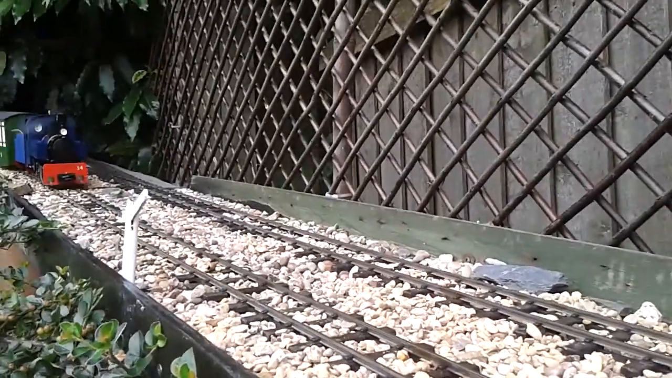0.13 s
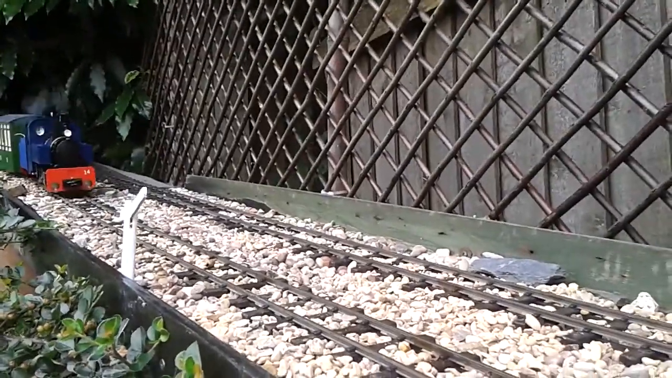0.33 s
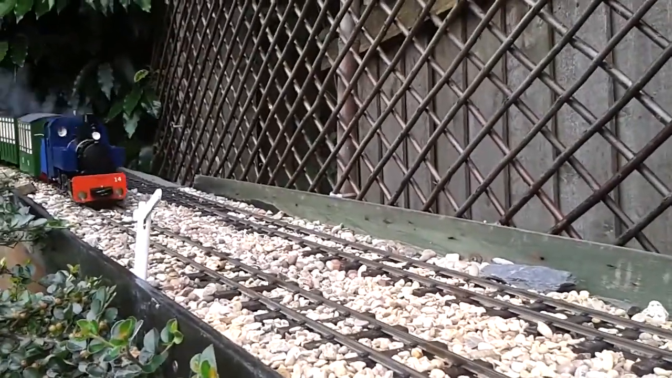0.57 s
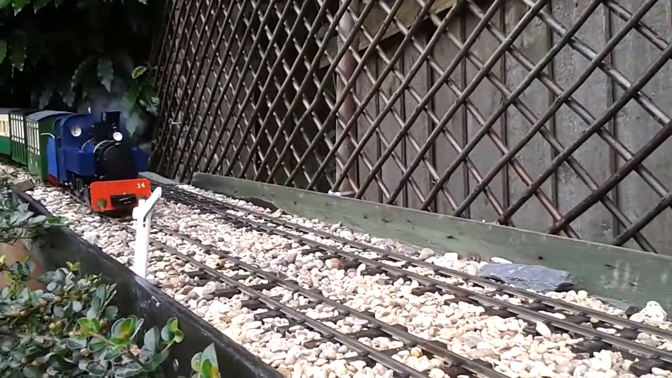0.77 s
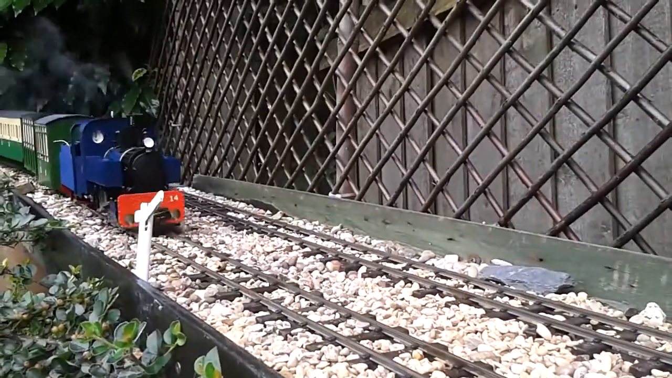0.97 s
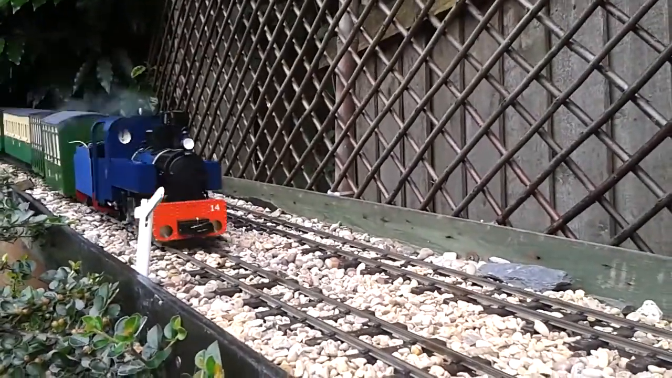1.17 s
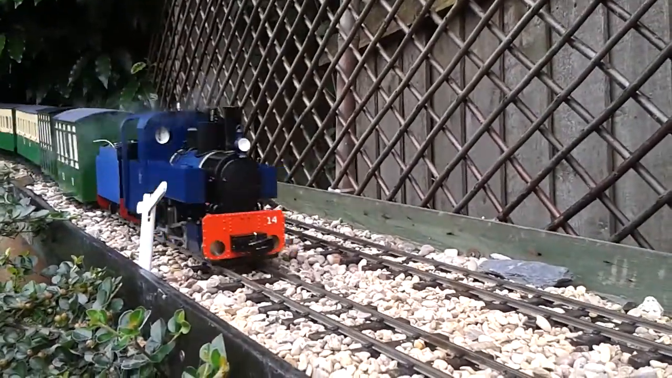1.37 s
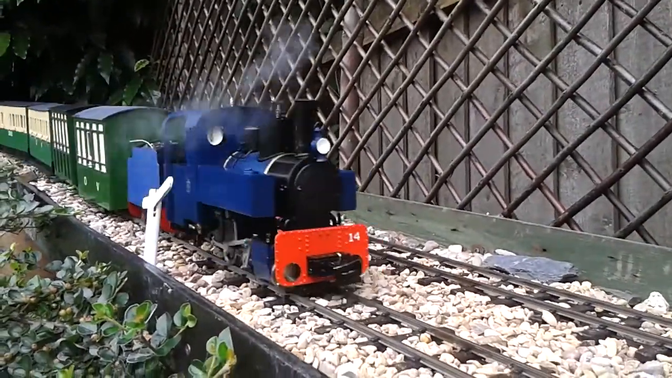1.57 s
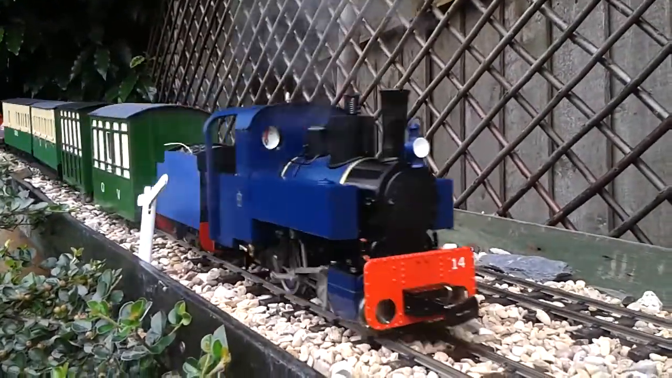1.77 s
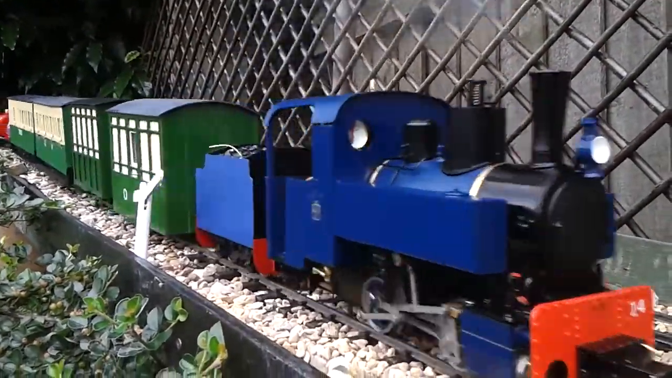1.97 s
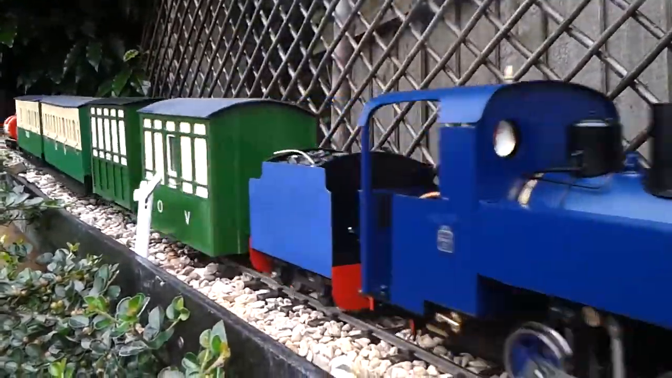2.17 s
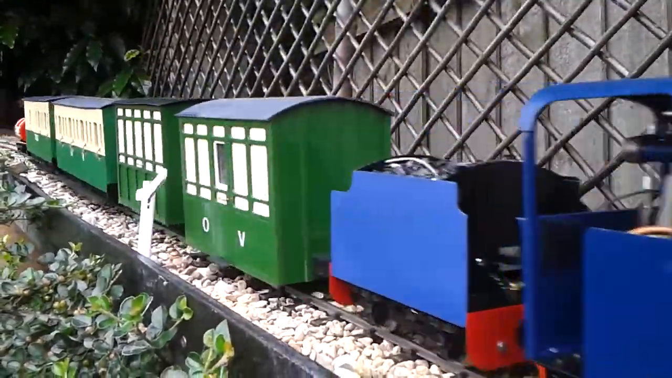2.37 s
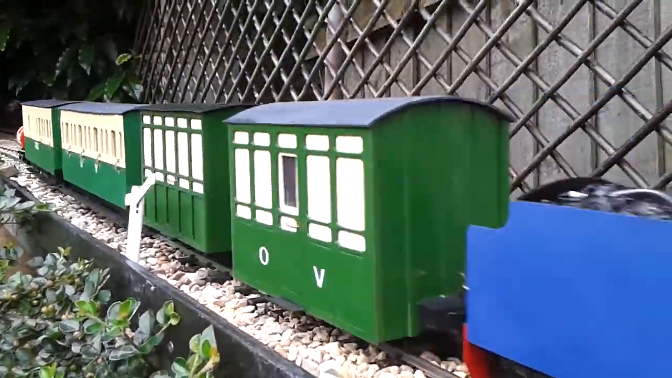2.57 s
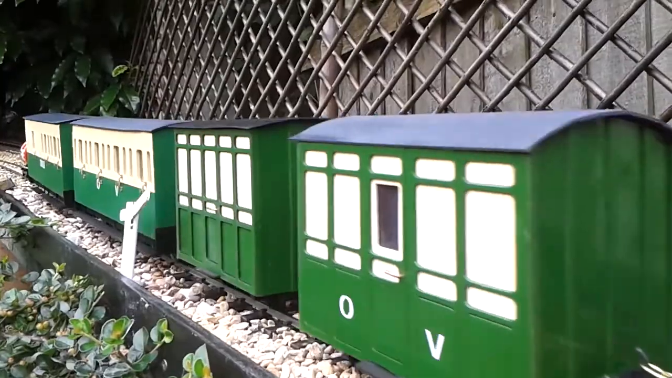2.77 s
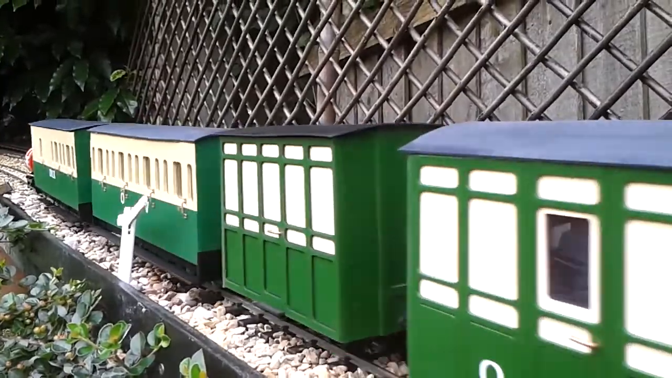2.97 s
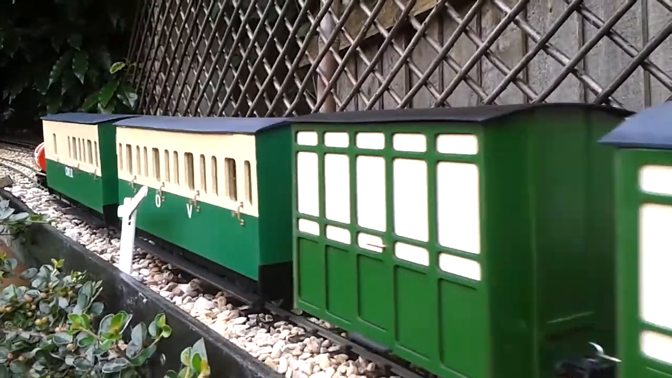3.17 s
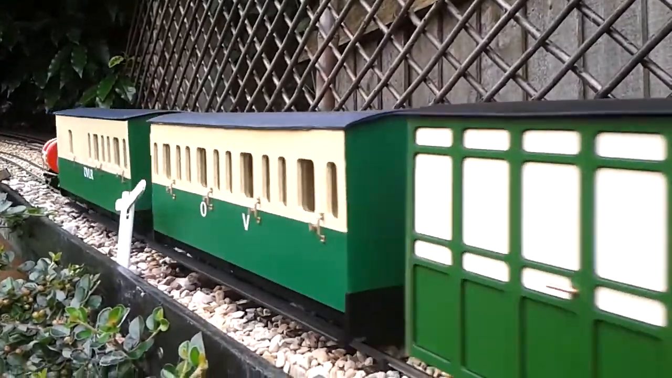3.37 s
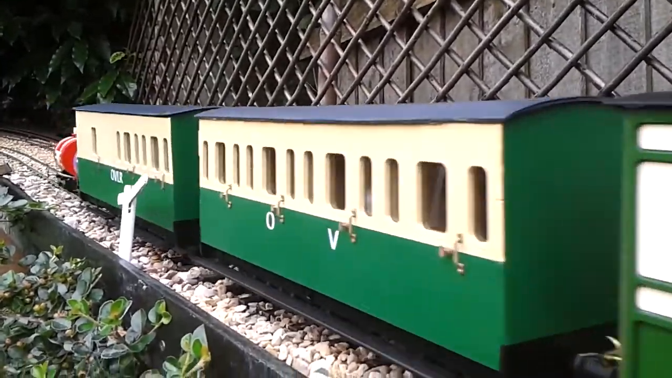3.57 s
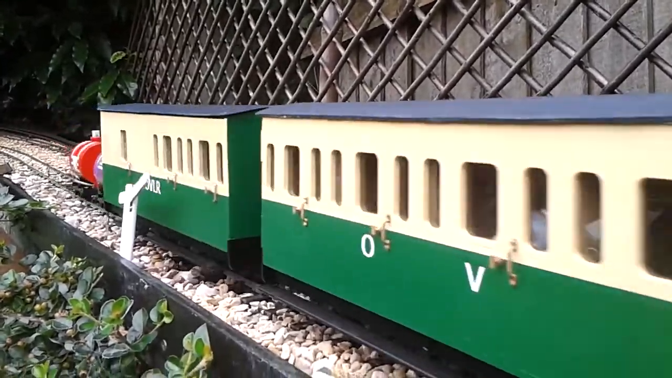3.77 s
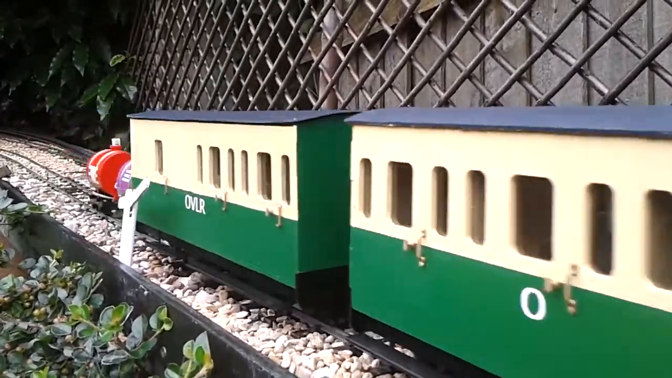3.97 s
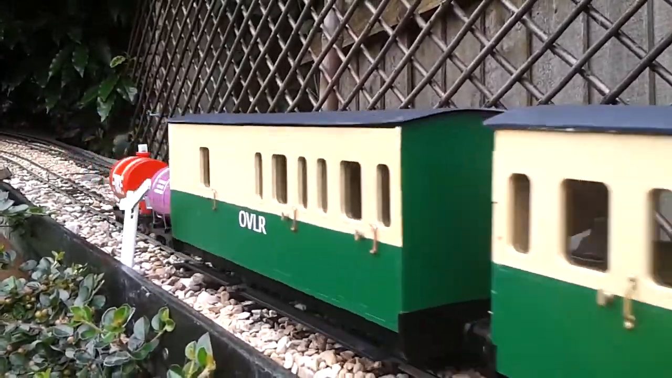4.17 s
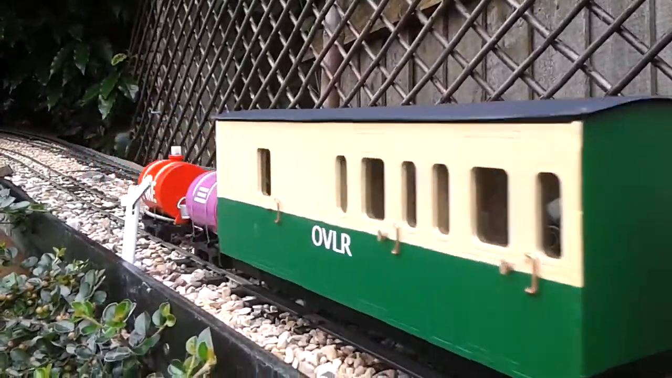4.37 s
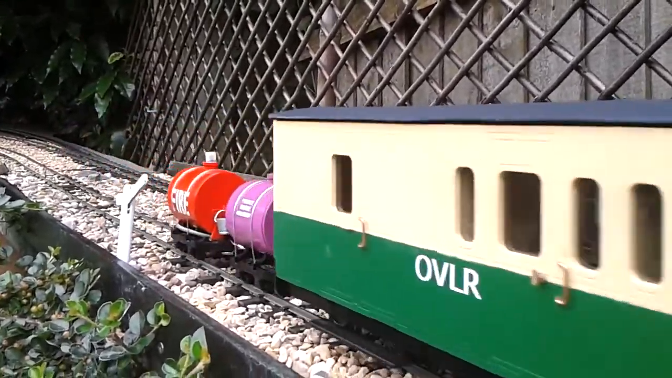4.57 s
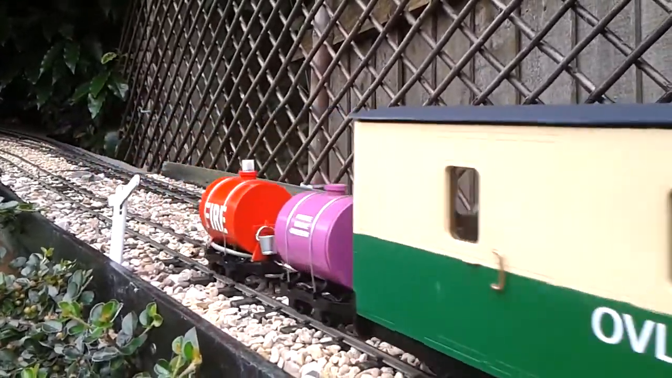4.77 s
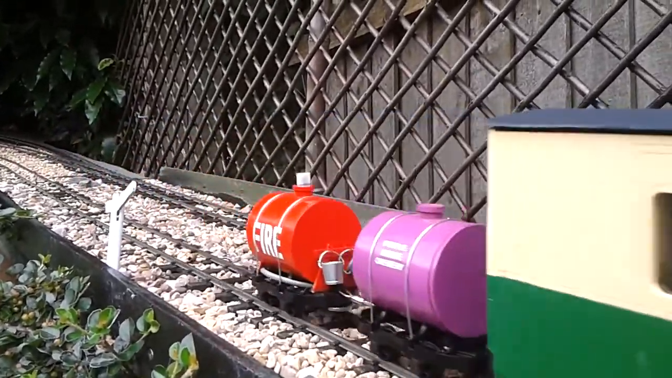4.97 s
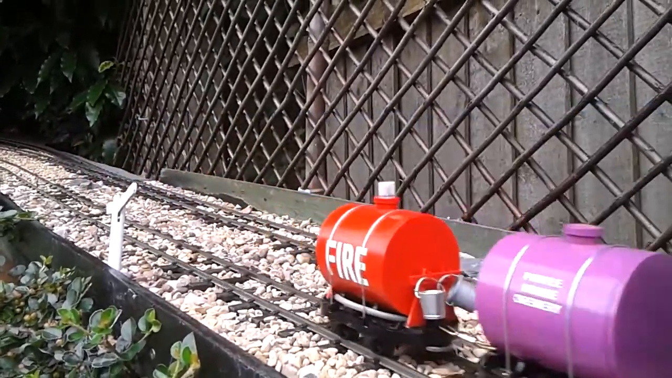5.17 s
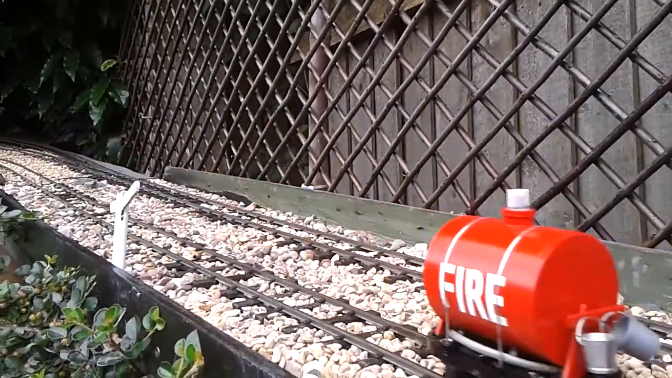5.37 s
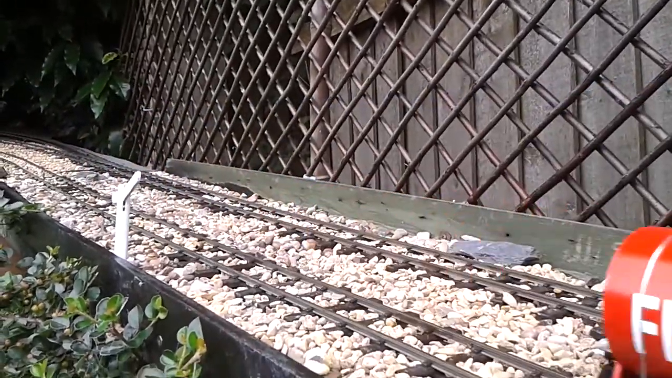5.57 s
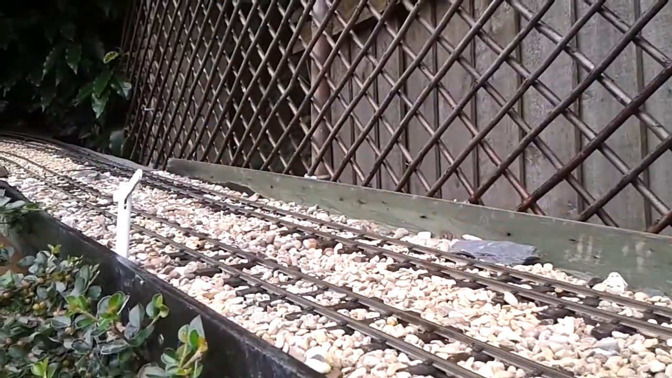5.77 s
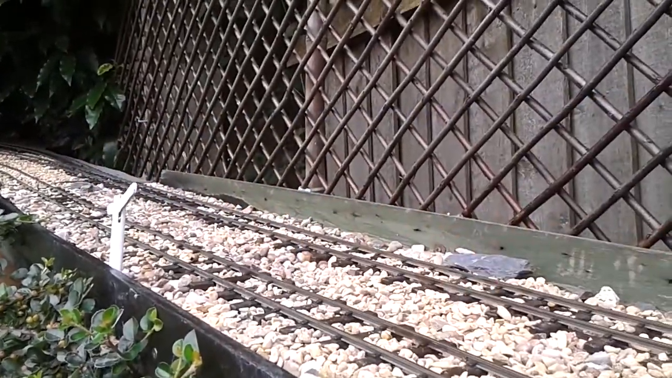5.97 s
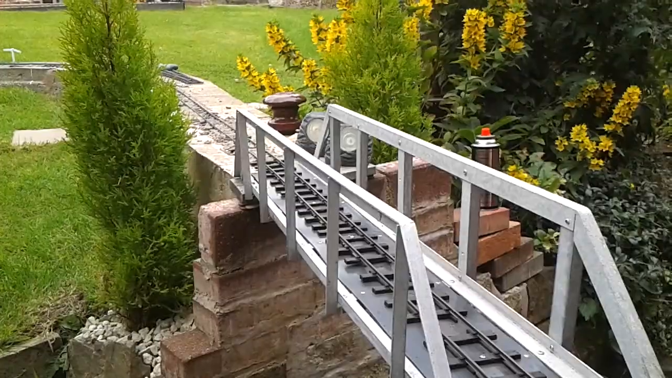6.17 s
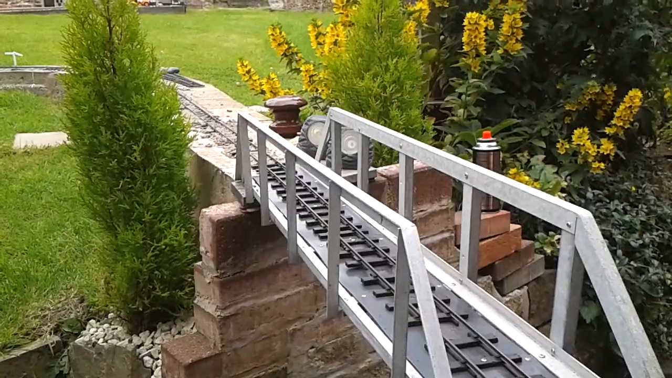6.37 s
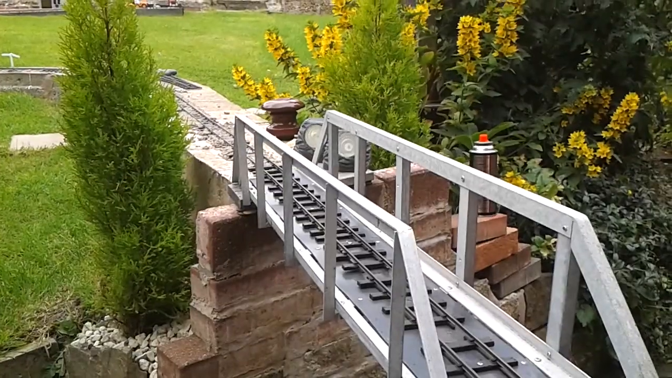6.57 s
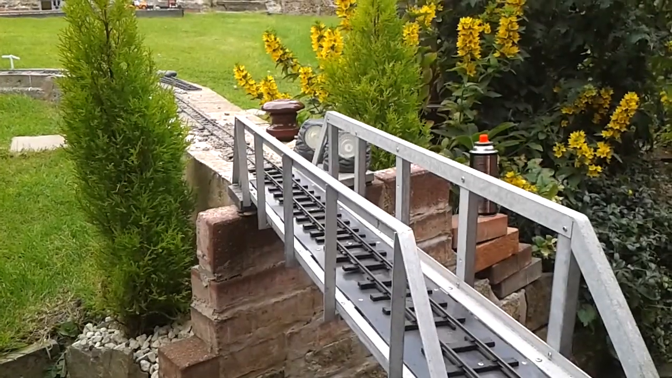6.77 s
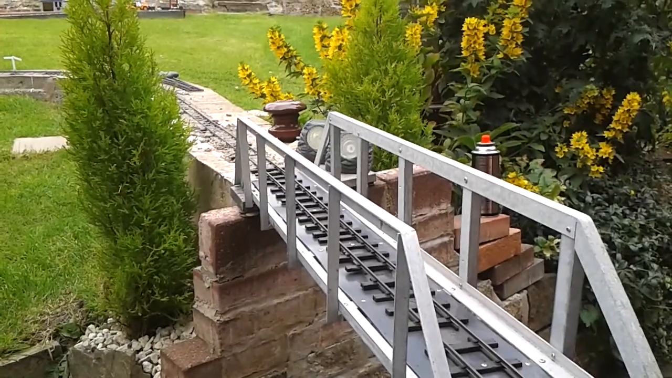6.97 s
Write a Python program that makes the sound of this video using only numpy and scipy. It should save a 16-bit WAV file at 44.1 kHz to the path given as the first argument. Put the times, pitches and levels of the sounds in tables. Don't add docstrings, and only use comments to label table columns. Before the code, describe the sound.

Outdoors in a garden, a miniature steam locomotive approaches a low microphone with very fast, uneven hissing puffs over a steady steam leak. It peaks early, then coaches boom hollowly and knock over rail joints, with a tiny squeal and tick. The puffs recede, cut to brief silence, then return faintly from afar with light ticks.

```python
import sys
import numpy as np
from scipy import signal
from scipy.fft import rfft, irfft, next_fast_len
from scipy.io import wavfile
from scipy.ndimage import uniform_filter1d, map_coordinates

SR = 44100
rng = np.random.default_rng(int(sys.argv[2]) if len(sys.argv) > 2 else 0)


def nominal_scale(level):
    x = np.asarray(level, float) / 20
    return 10 ** x


def dump_mix(stems):
    frames = np.atleast_2d(stems).T
    limited = np.clip(frames, -1, 1)
    pcm = np.round(limited * 32767).astype(np.int16)
    wavfile.write(sys.argv[1], SR, pcm)


N = 309229
CUT_S, RETURN_S = 6.0501, 6.386
PASS_S = 2.4
# (place in the turn [0-1], puff level [dB], puff length [ms], after-blow level [dB], its 60 dB decay [s])
STROKES = [
    (0, 1, 14, -3.5, .25),
    (.208, -1.24, 15, 4, 0.24),
    (.455, -0.23, 14, 0.6, .29),
    (.74, -0.17, 14.1, -3, .17),
]


def unit(x):
    return x / np.sqrt(np.mean(x ** 2) + 1e-20)


def curves(rows):
    s, *cols = np.transpose(rows)
    return [np.interp(np.arange(N) / SR, s, c) for c in cols]


def wobble(rate):
    knots = rng.standard_normal(int(N * rate / SR) + 4)
    return map_coordinates(knots, [np.arange(N) * rate / SR])


def filtered(x, response):
    m = next_fast_len(N + SR // 2)
    return irfft(rfft(x, m) * response(np.fft.rfftfreq(m, 1 / SR)), m)[..., :N]


def patchy(depth_db):
    z = signal.stft(rng.standard_normal(N + 1024), nperseg=512)[2]
    field = uniform_filter1d(rng.standard_normal(z.shape), size=2, axis=0)
    field = uniform_filter1d(field, size=5, axis=1)
    return signal.istft(z * nominal_scale(depth_db * unit(field)), nperseg=512)[1][:N]


def resonant(modes, depth_db):
    def ring(f):
        total = 0
        for k, (centre, width, db) in enumerate(modes):
            once = f * width / (centre * centre - f * f + 1j * f * width)
            total = total + (-1) ** k * nominal_scale(db) * once ** 2
        return total
    return unit(filtered(patchy(depth_db), ring))


def coloured(spectrum, depth_db):
    f, db = np.transpose(spectrum)

    def response(hz):
        return nominal_scale(np.interp(np.log(hz + 1), np.log(f), db, -120, -120))
    return unit(filtered(patchy(depth_db), response))


def steadied(x):
    return unit(x / (uniform_filter1d(x ** 2, size=220) + .05) ** .25)


def passing():
    along = (np.arange(N) / SR - PASS_S) / 1.0
    return np.degrees(np.arctan(along)), -10 * np.log10(1 + along ** 2)


def seen(sides, afar, loss_db=0):
    deg, *cols = np.transpose(sides)
    bearing = passing()[0]
    near = np.arange(N) < CUT_S * SR
    return [np.where(near, np.interp(bearing, deg, c) + loss_db, far) for c, far in zip(cols, afar)]


def beats():
    # (time of the first stroke [s], puff level [dB]); the last row of a run only ends a turn
    nearing = [(.014, -34.5), (.158, -35), (.303, -32.5), (.452, -33), (.601, -31.5), (.752, -31.5),
               (.899, -30), (1.051, -28.5), (1.203, -26), (1.361, -27), (1.518, -24.5), (1.678, -24),
               (1.843, -23), (2.021, -20), (2.204, -21)]
    leaving = [(2.393, -21.5), (2.582, -21), (2.776, -21.5), (2.973, -21), (3.173, -21.5), (3.366, -22.5),
               (3.556, -25), (3.751, -23), (3.95, -25.5), (4.15, -26.5), (4.355, -25), (4.568, -24),
               (4.779, -26), (4.991, -24.5), (5.206, -26.5), (5.421, -27.5), (5.632, -28.5), (5.841, -28.5),
               (6.045, -27.5), (6.25, -28)]
    far_turns = [(6.288, -45), (6.458, -39.5), (6.63, -42.5), (6.802, -39.5), (6.981, -38), (7.16, -35)]
    rows = []
    for turns in (list(nearing) + list(leaving), list(far_turns)):
        for (s, db), (end, end_db) in zip(turns, turns[1:]):
            for k, (place, *_) in enumerate(STROKES):
                rows.append((s + place * (end - s), db + place * (end_db - db), k))
    return [b for b in rows if b[0] < CUT_S or RETURN_S < b[0] < N / SR]


def low_end():
    # (time [s], peak level [dB], length [s])
    gusts = [(.09, -38, .09), (.45, -38, .1), (0.704, -39, 0.076), (0.996, -48.5, .15), (1.217, -36, 0.031),
             (1.409, -26.5, .06), (1.62, -39, 0.041), (1.73, -38.5, 0.032), (3.75, -54.5, 0.21),
             (4.402, -53, 0.31), (4.925, -51.5, 0.12), (5.11, -43.5, 0.028), (5.4, -54.5, 0.31),
             (6.032, -45, 0.061), (6.653, -38.5, 0.016), (6.79, -41.5, .03)]
    # (frequency [Hz], density [dB per Hz])
    buffet = [(22, -30), (44, -9.5), (60, -0.5), (95, 3), (140, -5), (250, -15.5), (500, -45)]
    # (centre [Hz], width [Hz], level [dB])
    heavy_modes = [(182, 173, 0)]
    light_modes = [(297, 150, 0)]
    t = np.arange(N) / SR
    wind = nominal_scale(-57.5)
    for s, db, length in gusts:
        wind = wind + nominal_scale(db) * np.exp(-.5 * ((t - s) / length) ** 2)
    thumps = unit(nominal_scale(2.04 * wobble(20)) * coloured(buffet, 0.57))
    engine = np.exp(-((t - PASS_S) / .8) ** 2)
    hum_db = np.where(t < CUT_S, -47 + 4 * engine, -55)
    heavy = .3 + .5 * engine
    hum = np.sqrt(heavy) * resonant(heavy_modes, 1.5) + np.sqrt(1 - heavy) * resonant(light_modes, 2.1)
    return nominal_scale(-2.55) * wind * thumps + nominal_scale(hum_db + 1.5 * wobble(20)) * hum


def rolling():
    # (time [s], boom level [dB], boom centre [Hz])
    roll = [(0, -47, 654), (.64, -44.5, 633), (1.2, -44.5, 710), (1.8, -39.5, 635), (2.78, -40.5, 701),
            (3.28, -41.5, 520), (3.8, -33.5, 573), (4.05, -36.5, 565), (4.25, -33.5, 553), (4.6, -36, 600),
            (5.15, -36.5, 650), (5.6, -41.5, 647), (6.05, -39.5, 686), (6.38, -49.5, 660), (7.01, -52, 660)]
    # (frequency [Hz], density [dB per Hz])
    rattle = [(700, -24.5), (1000, 0.5), (1250, 1.5), (1700, -5.5), (2300, -3.5), (3500, -29.5)]
    # (centre [Hz], width [Hz], level [dB])
    rail_tone = [(716, 70, 0)]
    # (time [s], peak level [dB], ring [Hz])
    joints = [
        (0.194, -26, 1140),
        (0.409, -20.5, 1177),
        (0.516, -23, 1140),
        (1.155, -27, 628),
        (1.498, -22.5, 710),
        (2.781, -25, 810),
        (3.608, -19.5, 541),
        (3.759, -20, 413),
        (4.509, -24, 651),
        (5.083, -18, 700),
    ]
    boom_db, centre_hz = curves(roll)
    near = np.arange(N) < CUT_S * SR
    rattle_db = np.where(near, -45.5 + 0.19 * (boom_db - boom_db.mean()), -63)
    share = np.clip((centre_hz - 480) / 260, 0, 1)
    low_boom = resonant([(470.0, 210, 0.1), (613, 155, -3.0)], 2.05)
    high_boom = resonant([(704, 230, 1.5), (886, 213, -2.5)], 2.6)
    boom = np.sqrt(1 - share) * low_boom + np.sqrt(share) * high_boom
    boom = boom + nominal_scale(-8) * resonant(rail_tone, 1.7)
    knocks = np.zeros(N + SR)
    t = np.arange(SR // 10) / SR
    for s, db, hz in joints:
        ring = np.sin(2 * np.pi * hz * t) + .7 * uniform_filter1d(rng.standard_normal(len(t)), size=12)
        decay = nominal_scale(db - 0.5 - 60 * t / 0.052)
        knocks[round(s * SR):][:len(t)] += decay * ring * (1 - np.exp(-t / 0.0055))
    bumps = wobble(25)
    boom = nominal_scale(boom_db - 2.0 + 1.35 * bumps) * boom
    return knocks[:N] + boom + nominal_scale(rattle_db + 1.06 + 2.0 * bumps) * coloured(rattle, 3.0)


def valve_gear():
    # (time [s], peak level [dB])
    ticks = [
        (3.745, -16),
        (6.5375, -21.5),
        (6.662, -25),
        (6.8648, -21),
    ]
    out = np.zeros(N + SR)
    t = np.arange(SR // 50) / SR
    for s, db in ticks:
        decay = nominal_scale(db + 2.5 - 60 * t / 0.017)
        attack = 1 - np.exp(-t / .0008)
        out[round(s * SR):][:len(t)] += decay * attack * np.sin(2 * np.pi * 6670 * t)
    return out[:N]


def squeal():
    # (middle [s], length [ms], level [dB], pitch [Hz], octave relative to it [dB])
    slips = [
        (3.428, 7, -13, 4920, -26),
        (3.439, 6, -20, 4380, -7.5),
        (3.457, 7.2, -17, 4400, -8),
        (3.491, 3.8, -14, 4360, -20),
    ]
    t = np.arange(N) / SR
    s, ms, db, hz, octave_db = np.transpose(slips)[..., None]
    grips = nominal_scale(db) * np.exp(-np.abs((t - s) * 1000 / ms) ** 2.5)
    slack = nominal_scale(-35) * np.exp(-((t - s.mean() - .012) / 0.042) ** 6)
    whole = grips.sum(0) + slack + 1e-9
    slack_weight = (slack + 1e-9) ** 2
    pitch_hz = ((grips ** 2 * hz).sum(0) + slack_weight * 4770) / ((grips ** 2).sum(0) + slack_weight)
    phase = 2 * np.pi * np.cumsum(pitch_hz * (1 + .008 * wobble(400))) / SR
    flutter_db = .6 * wobble(500)
    octave = (grips * nominal_scale(octave_db)).sum(0) * nominal_scale(2 * flutter_db)
    return np.sqrt(2) * nominal_scale(flutter_db) * (whole * np.sin(phase) + octave * np.sin(2 * phase))


def leak():
    # (bearing [degrees], cylinder level [dB], gland level [dB], broad hiss level [dB])
    leak_sides = [(-64, -35.5, -29, -27.5), (-55.5, -40, -30.5, -29.5), (-40, -38.5, -29.5, -30),
                  (-15.5, -31, -28, -32.5), (12.5, -35, -30.5, -29), (33, -34, -34, -31.5),
                  (55.5, -38.5, -36, -30.5), (73, -35, -33.5, -26)]
    leak_afar = (-53.5, -53.5, -40.5)
    # (centre [Hz], width [Hz], level [dB])
    cylinder_modes = [(2652, 530, 0)]
    gland_modes = [(5030, 570, 0.5), (5410, 310, -3.5)]
    # (frequency [Hz], density [dB per Hz])
    near_hiss = [(1500, -11), (2100, -14), (3500, -5), (5500, 0), (6600, -1.5), (7400, -11), (8000, -8.5),
                 (8700, -15), (10800, -16), (11800, -41)]
    far_hiss = [(1500, -36), (2400, -9.5), (4000, -3.5), (5300, -10), (6100, -3), (6600, 4), (7200, -10),
                (8000, -31), (8700, -22), (10500, -25.5), (11500, -35)]
    cylinder_db, gland_db, broad_db = seen(leak_sides, leak_afar, passing()[1])
    t = np.arange(N) / SR
    starts = np.array([0] + [b[0] for b in beats()])
    last_beat = starts[np.searchsorted(starts, t, "right") - 1]
    since = np.minimum(t - last_beat, .07)
    sag_db = uniform_filter1d(2.5 - 110 * since, size=300)
    spit_db = .6 * wobble(300) + 1.2 * wobble(12)
    hiss = nominal_scale(cylinder_db) * resonant(cylinder_modes, 1.5) + nominal_scale(gland_db) * resonant(gland_modes, 3.4)
    broad = np.where(t < CUT_S, coloured(near_hiss, 2.7), coloured(far_hiss, 2.9))
    return nominal_scale(spit_db + sag_db) * (hiss + nominal_scale(broad_db) * broad)


def exhaust():
    # (bearing [degrees], base modes [dB], mid modes [dB],
    # high over low modes [dB], fizz over high modes [dB], after-blow [dB])
    chimney_sides = [(-63.5, -2, 6.5, 3, -16, -4), (-57.5, 2.5, 3.5, 2, -16, -7),
                     (-47.5, -3.5, 1, 0.5, -15, -9), (-27, -1.5, -0.4, -2.5, -12, -9.5),
                     (1.5, -0.4, -3, 5, -15, -10.5), (30, -0.4, -2.5, 0.7, -13, -9),
                     (67.5, -2.5, -8, 1.6, -16.5, -10.5), (73.5, -3.5, -8.5, 1, -18, -10)]
    chimney_afar = (-5, -13, 4, -26, -12)
    # (centre [Hz], width [Hz], level [dB])
    base_modes = [(2399, 733, 2.5), (3226, 840, 4.5)]
    low_modes = [(3605, 485, -3), (4027, 480, -1), (4513, 510, -6)]
    mid_modes = [(5230, 1000, -1.3), (5890, 720, -0.64)]
    high_modes = [(6254, 770, 1.5), (7014, 1100, -7.5)]
    fizz_modes = [(8755, 920, 5), (10800, 2500, -3.5)]
    base_db, mid_db, high_db, fizz_db, after_db = seen(chimney_sides, chimney_afar)
    t = np.arange(SR // 8) / SR
    low, high = np.zeros((2, N + SR))
    rows = beats()
    gaps = np.diff([b[0] for b in rows], append=N / SR + .03)
    chance = rng.standard_normal((len(rows), 3)) * [.9, 1.3, .17]
    for (s, db, k), gap, (size_db, colour_db, stretch) in zip(rows, gaps, chance):
        _, puff_db, ms, stroke_db, t60 = STROKES[k]
        ms = ms * np.exp(stretch) * (0.77 if s > CUT_S else 1)
        ms = ms * (min(gap, .06) / 0.048) ** 0.46
        top = 0.0052 + 0.00023 * ms
        width = np.where(t < top, .0031, 0.00054 * ms)
        puff = np.exp(-.5 * ((t - top) / width) ** 2)
        start = round((s - .0045) * SR)
        shut = np.clip((min(gap, .07) - t) / 0.01, 0, 1)
        after = nominal_scale(after_db[start] + stroke_db - 60 * np.maximum(t - top, 0) / t60)
        after = after * np.clip(t / top, 0, 1) ** 3 * shut
        blow = nominal_scale(db + puff_db + size_db) * np.hypot(puff, after)
        low[start:][:len(t)] += blow
        high[start:][:len(t)] += nominal_scale(high_db[start] + colour_db) * blow
    eddies = nominal_scale(1.3 * wobble(500))
    spots_db = 3.7
    lower = resonant(base_modes, spots_db) * nominal_scale(base_db) + resonant(low_modes, spots_db)
    lower = lower + resonant(mid_modes, spots_db) * nominal_scale(mid_db)
    upper = resonant(high_modes, spots_db) * nominal_scale(-3.0) + resonant(fizz_modes, 1.7) * nominal_scale(fizz_db)
    lower_jet = np.std(lower) * steadied(lower)
    upper_jet = np.std(upper) * steadied(upper)
    return eddies * (low[:N] * lower_jet + high[:N] * upper_jet)


def ground(x):
    # (time [s], lag [ms], level [dB])
    ground_echo = [(0, 1.12, -17), (1.2, 1.56, -11.5), (2.9, 1.98, -15), (3.5, 1.56, -17),
                   (4.05, 1.137, -7.5), (4.65, 0.87, -9.5), (5.35, 0.678, -9), (6.05, 0.51, -10.5),
                   (6.3, 0.46, -18), (7.01, 0.49, -20)]
    lag_ms, db = curves(ground_echo)
    echo = map_coordinates(x, [np.arange(N) - lag_ms * SR / 1000], order=3)
    return (x + nominal_scale(db) * echo) / np.sqrt(1 + nominal_scale(2 * db))


def scene():
    engine = ground(exhaust() + leak())
    return (engine + rolling() + low_end() + squeal() + valve_gear())[None]


def starve(x):
    # (frequency [Hz], level relative to the loudest band [dB])
    starved = [(7400, -50), (8100, -32), (8800, -33), (9800, -30), (11000, -29), (12200, -25)]
    hz, t, z = signal.stft(x, SR, "cosine", nperseg=1024)
    band = np.arange(len(hz)) // 10
    power = np.add.reduceat(np.abs(z) ** 2, np.arange(0, len(hz), 10)) / 10
    loudest = uniform_filter1d(power.max(axis=0), size=15)
    loudest = np.minimum(loudest, 2 * np.median(loudest))
    f, under_db = np.transpose(starved)
    limit_db = np.interp(hz[::10] + 200, f, under_db, left=-200)[:, None]
    chance_db = 2.2 * rng.standard_normal(power.shape[1]) + 2.5 * rng.standard_normal(power.shape)
    far_db = -4 * (t > CUT_S)
    step = np.sqrt(loudest) * nominal_scale(limit_db + chance_db + far_db)
    keep = (np.abs(z) > .8 * step[band]) & (np.sqrt(power) > step)[band]
    return signal.istft(z * keep, SR, "cosine", nperseg=1024)[1][..., :N]


def top_cut(x):
    return signal.sosfilt(signal.butter(12, 15800, fs=SR, output="sos"), x)


def record(dry):
    # (centre [Hz], width [Hz], depth [0-1])
    housing_dip = (8080, 690, 0.45)
    t = np.arange(N) / SR
    notch_hz, width, depth = housing_dip

    def colour(hz):
        dip = 1 - min(depth, .95) * np.exp(-((hz - notch_hz) / width * 2) ** 2)
        return dip / (1 + (hz / 12120) ** 60) * (hz < 12300)
    rounded = dry[0] / (1 + np.abs(dry[0] / .74) ** 4) ** (1 / 4)
    sound = starve(filtered(rounded, colour) + 1e-7)
    fade_in = np.clip((t - RETURN_S) / 0.35, 0, 1) ** 0.95
    gate = (t < CUT_S) + fade_in
    return top_cut(sound[None] * gate)


dry = scene()
out = record(dry)
dump_mix(out)
```